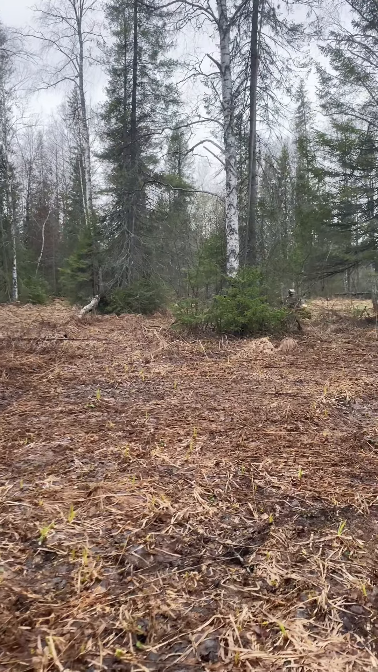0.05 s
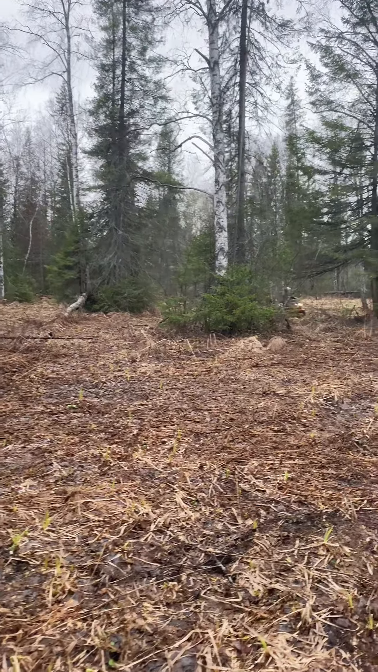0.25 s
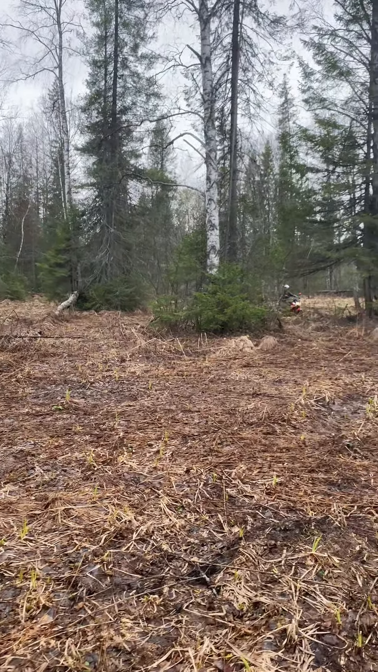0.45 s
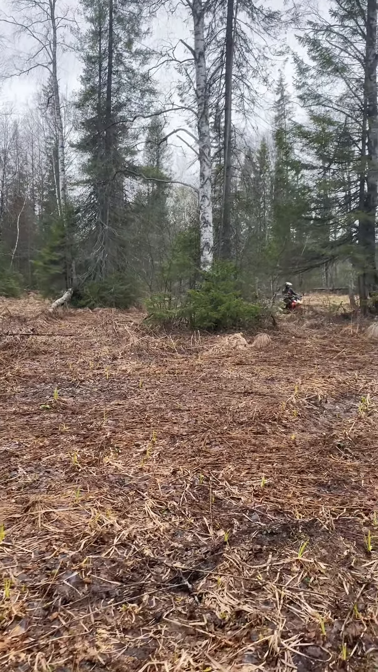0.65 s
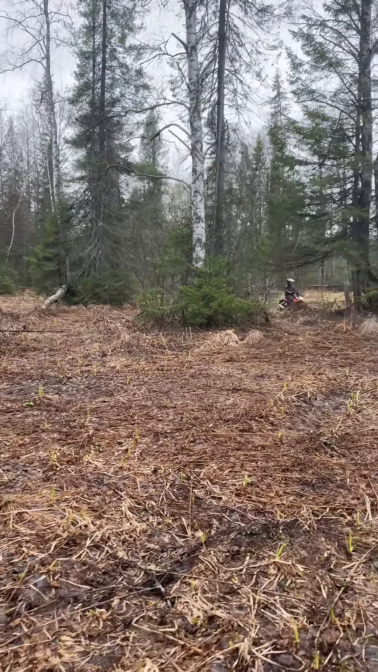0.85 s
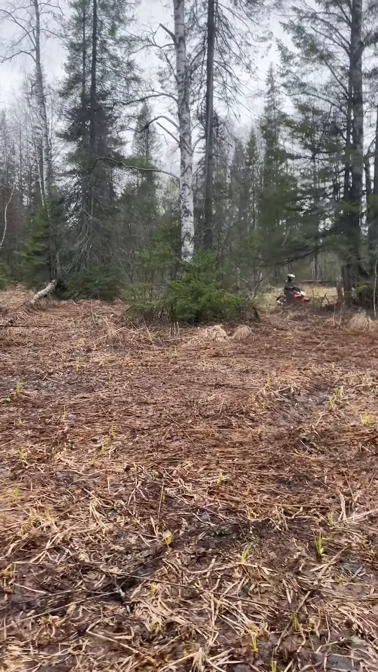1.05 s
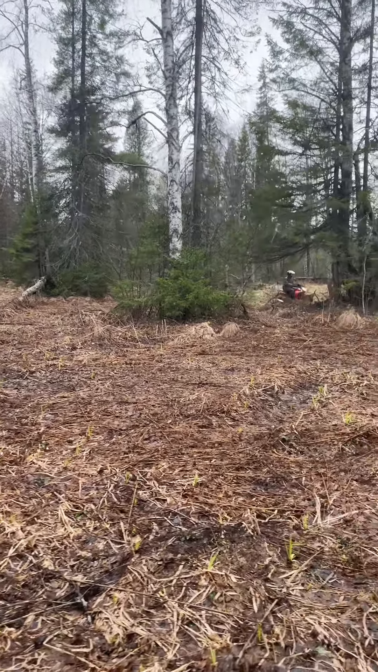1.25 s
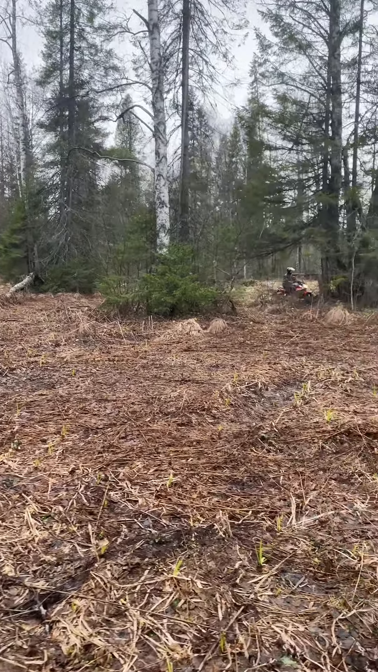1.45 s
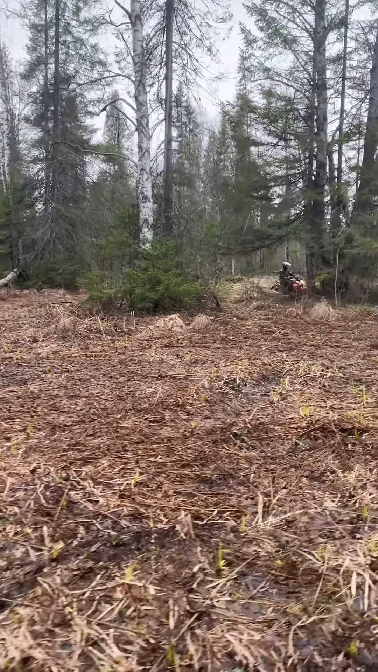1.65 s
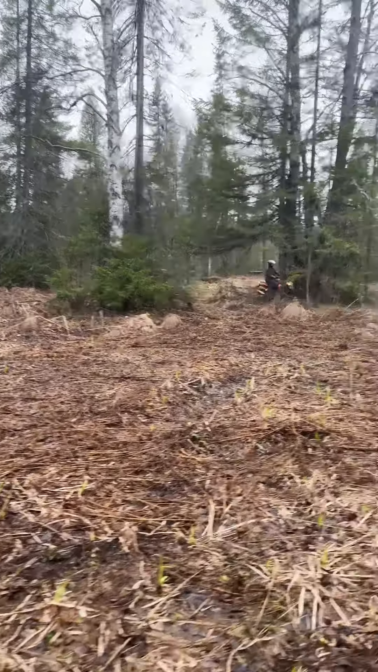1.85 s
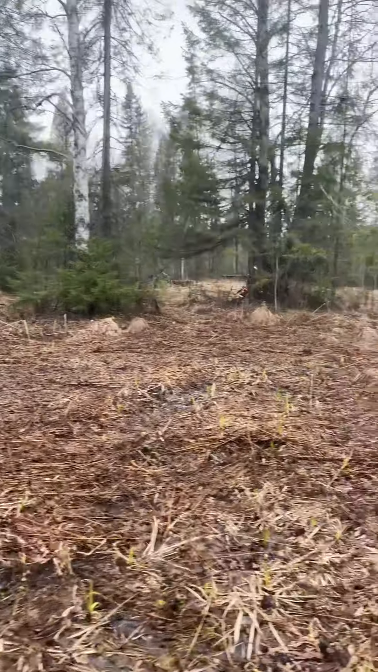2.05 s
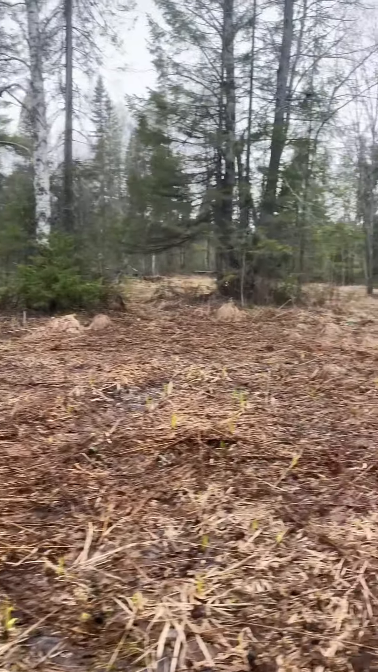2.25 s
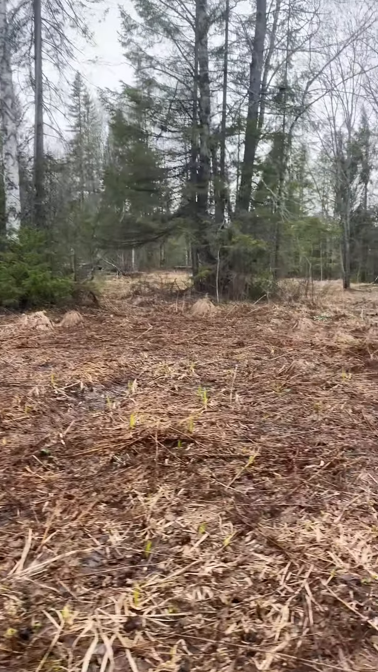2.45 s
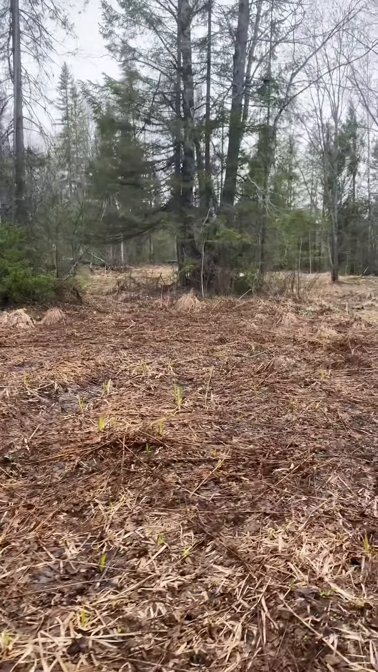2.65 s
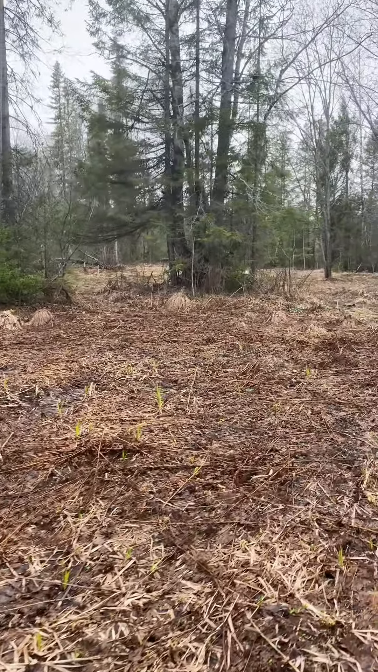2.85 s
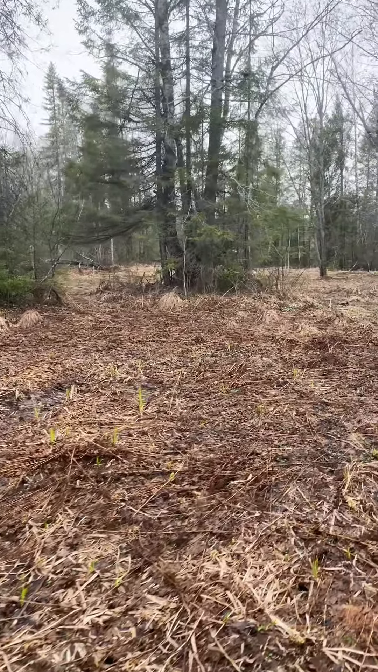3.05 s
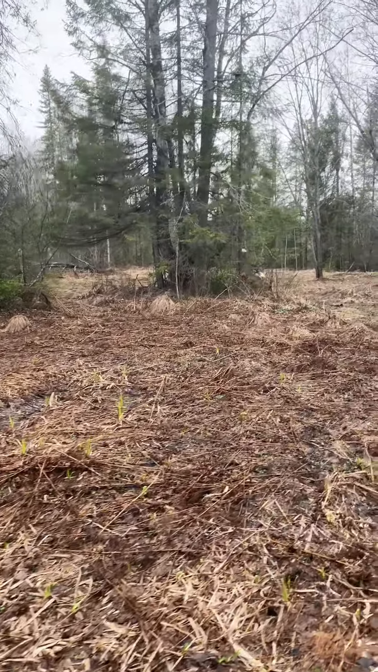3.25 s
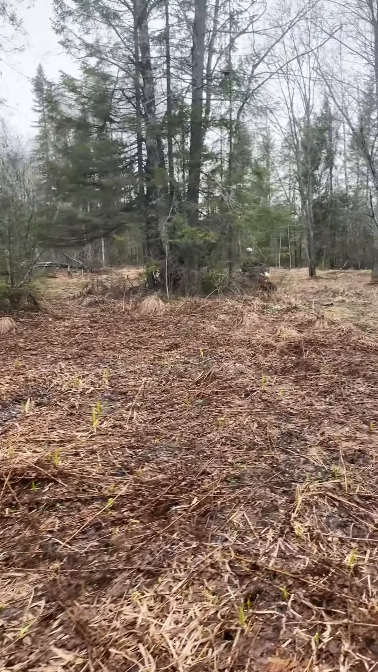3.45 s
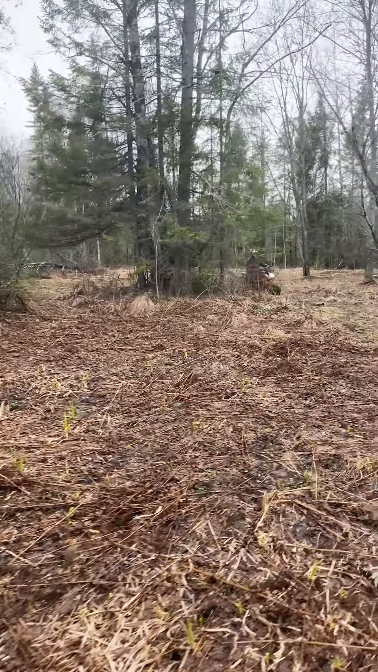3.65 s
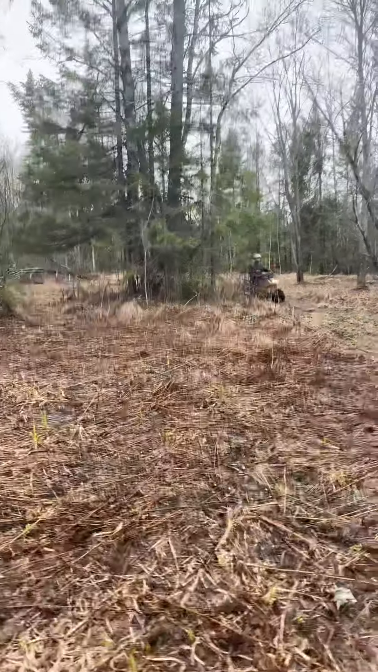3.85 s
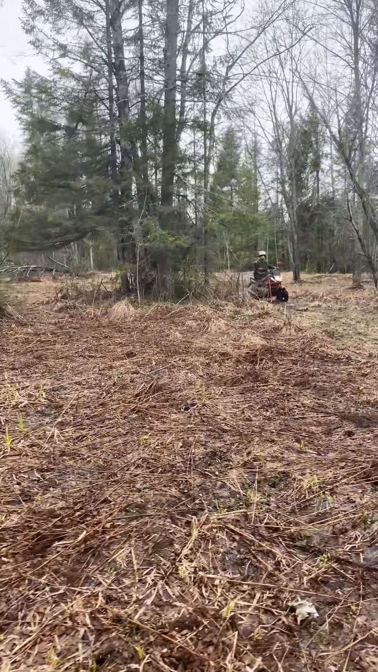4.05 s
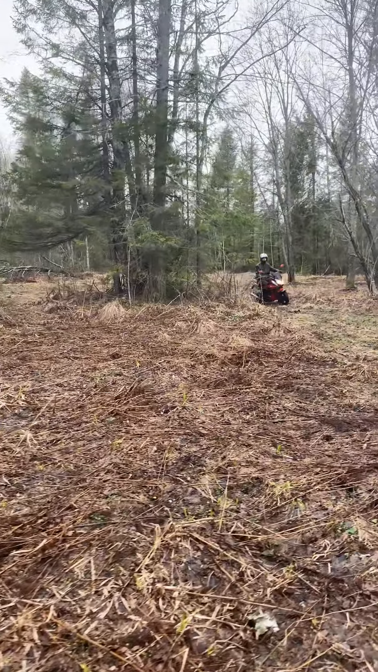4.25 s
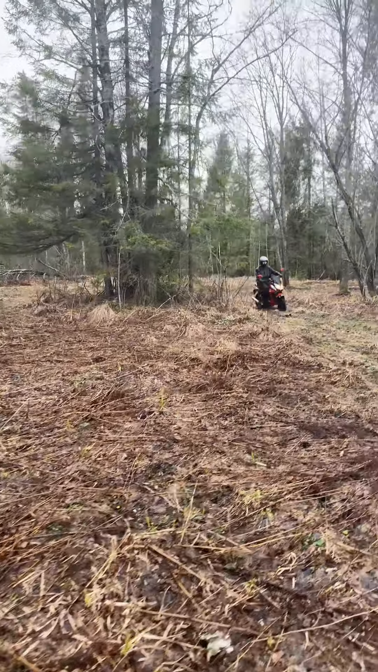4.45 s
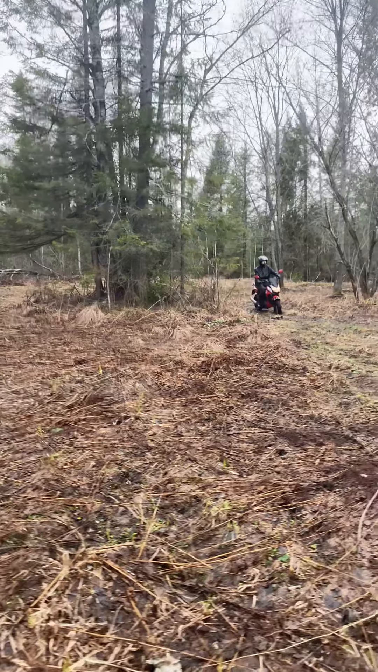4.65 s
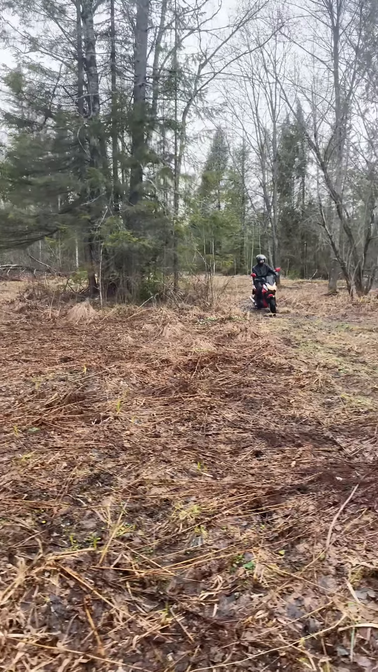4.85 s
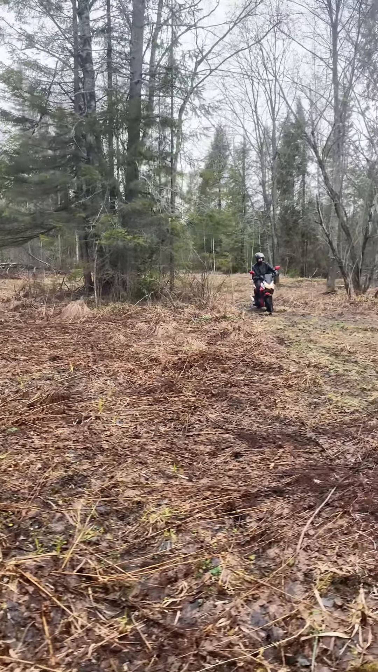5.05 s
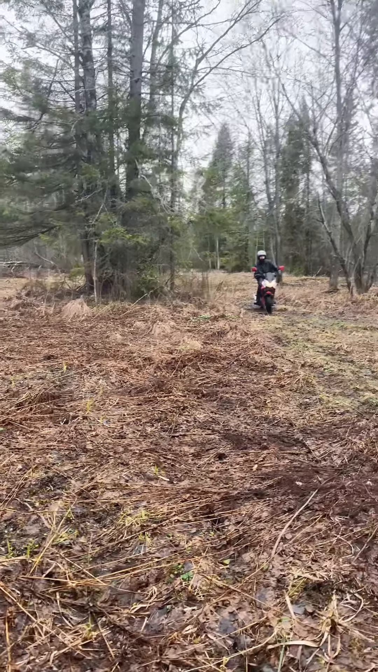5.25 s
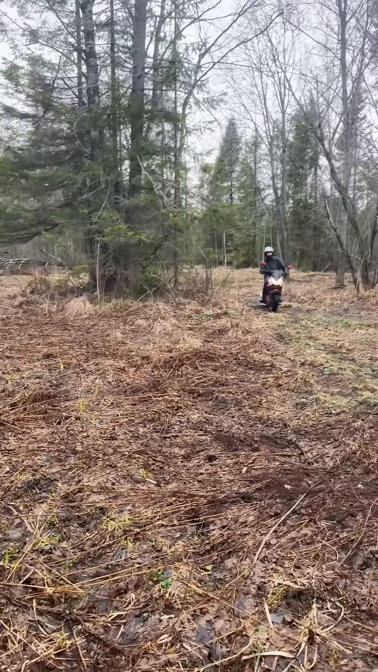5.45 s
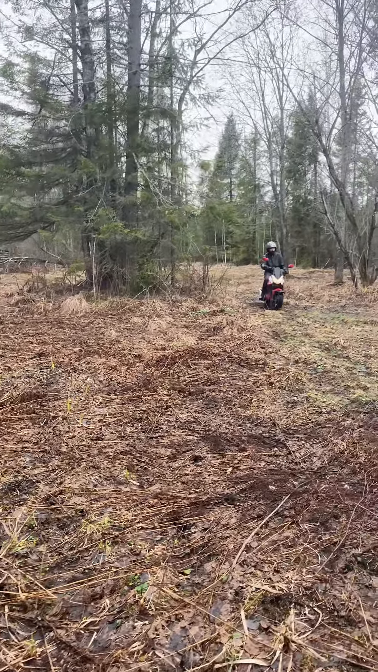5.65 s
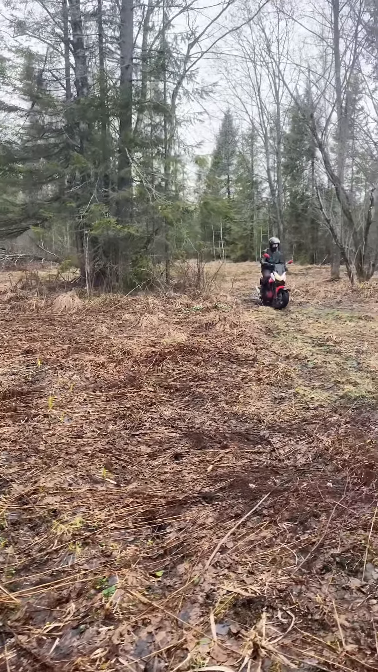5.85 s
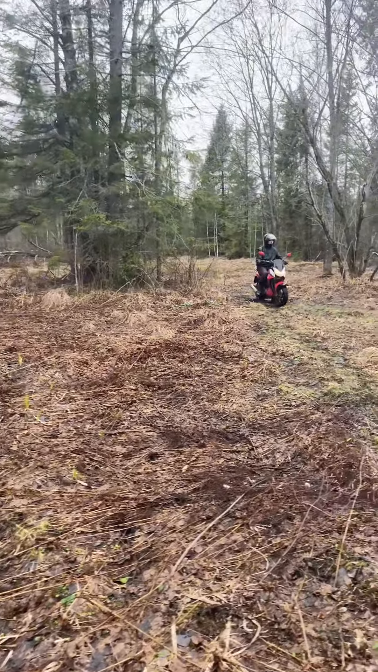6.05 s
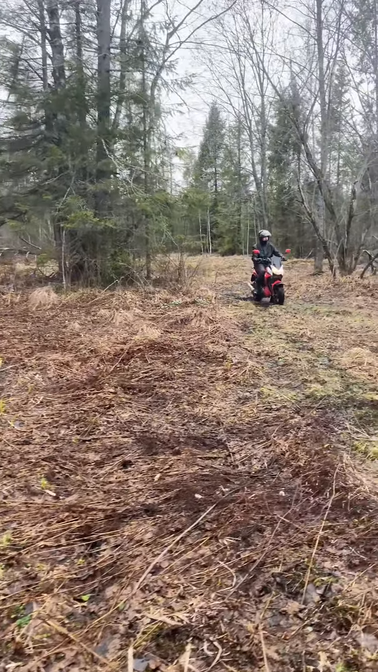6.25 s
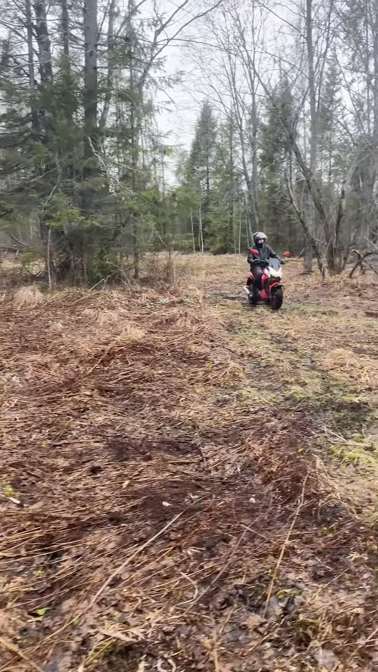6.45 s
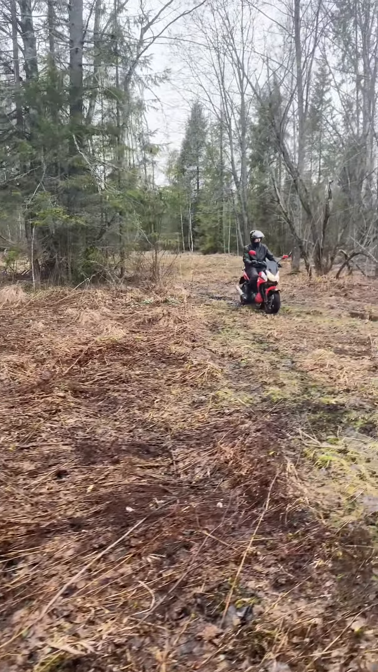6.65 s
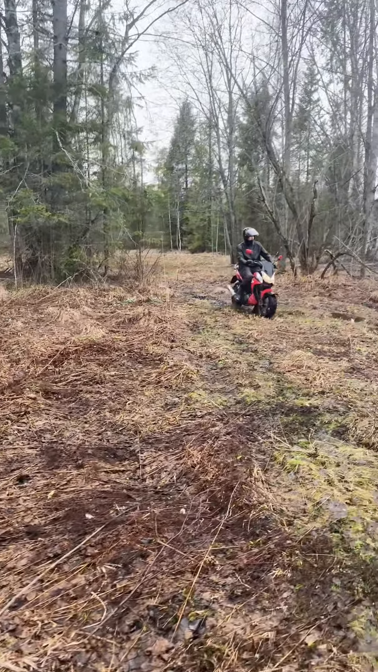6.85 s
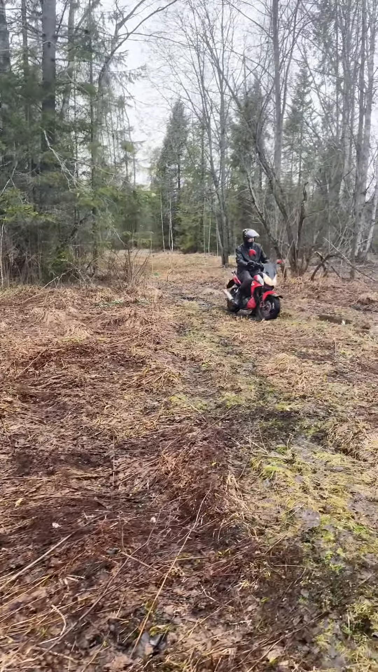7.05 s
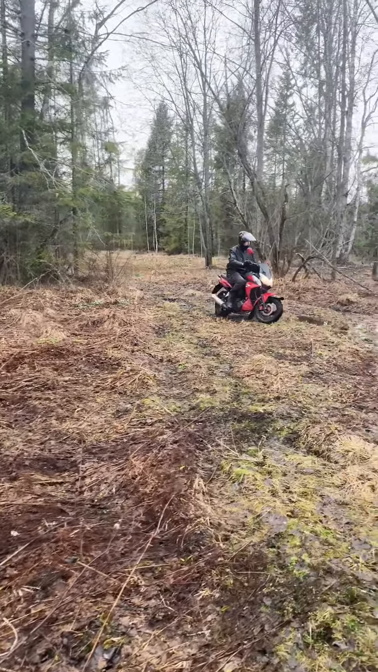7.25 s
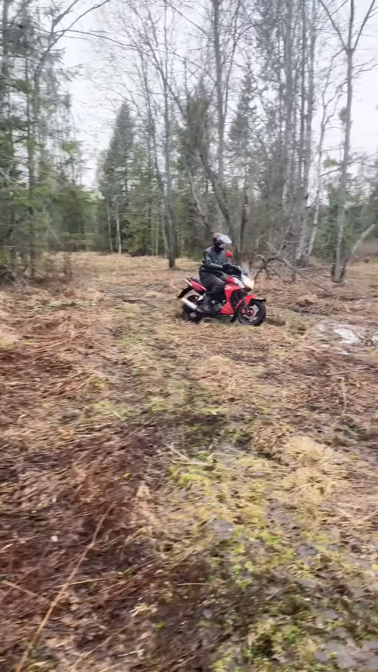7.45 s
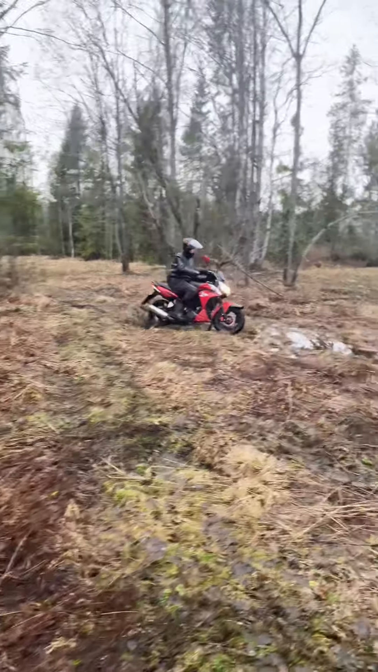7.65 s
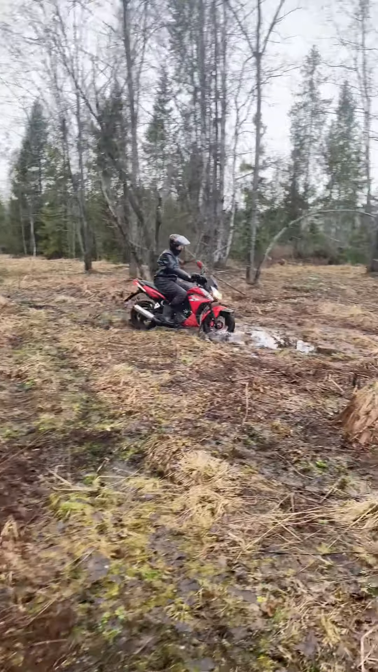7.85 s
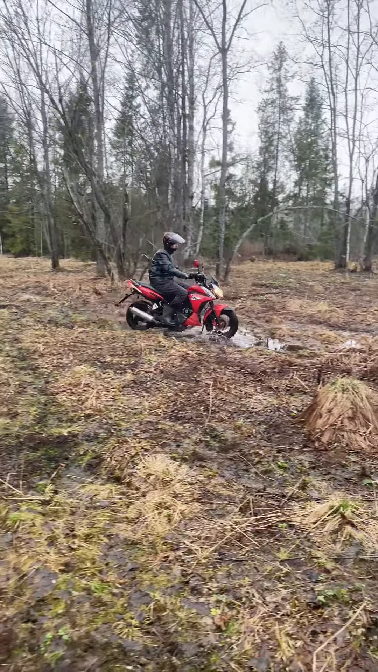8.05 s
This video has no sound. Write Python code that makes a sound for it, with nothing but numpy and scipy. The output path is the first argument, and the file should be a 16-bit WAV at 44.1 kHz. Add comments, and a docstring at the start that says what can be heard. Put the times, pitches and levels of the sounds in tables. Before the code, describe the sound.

A small single-cylinder motorcycle throbs through a quiet forest, fades behind trees, then putters close and revs up past the microphone over crackling dry grass.

```python
"""A small single-cylinder four-stroke motorcycle picks its way over dry grass at a forest edge and comes close.
Every firing knocks on the metal cylinder, then booms in the exhaust; the throttle is opened in short pulls.
Clicks timed by the engine ring resonances; intake rasp and clatter are noise shaped by the same timing.
Dry stalks rustle and snap near the microphone (shaped noise), gusts and dull bumps buffet it,
a bird whistles two notes, and the forest is a steady, softly flickering noise with a faint echo."""
import sys
import numpy as np
from scipy import signal
from scipy.fft import rfft, irfft, next_fast_len
from scipy.io import wavfile
from scipy.ndimage import uniform_filter1d

SR = 44100
rng = np.random.default_rng(int(sys.argv[2]) if len(sys.argv) > 2 else 0)


def digitize_waveform(pressure):
    """Quantize a signal to 16-bit integers and store it at the path in sys.argv[1].

    Rows of a 2-D input are taken as channels; values are limited to [-1, 1].
    """
    field = np.atleast_2d(pressure).T
    bounded = np.clip(field, -1, 1)
    quanta = np.round(bounded * 32767).astype(np.int16)
    wavfile.write(sys.argv[1], SR, quanta)


N = 357651
TIME = np.arange(N) / SR  # seconds

# The engine's speed. Each row: time in seconds, firings per second.
ENGINE_SPEED = [(0.0, 25.67), (0.08, 26.96), (0.24, 23.86), (0.32, 24.54), (0.72, 22.09), (0.8, 23.07),
                (0.96, 26.58), (1.2, 27.26), (1.44, 31.32), (1.6, 27.19), (1.84, 25.75), (1.92, 28.28),
                (2.16, 25.93), (2.4, 29.89), (2.48, 28.69), (2.64, 30.08), (2.72, 29.16), (2.88, 31.05),
                (3.04, 30.03), (3.12, 26.68), (3.52, 28.14), (3.68, 29.36), (4.0, 26.99), (4.48, 23.94),
                (4.56, 17.93), (4.64, 20.5), (4.72, 19.49), (4.88, 20.55), (5.04, 17.88), (5.2, 17.54),
                (5.28, 19.0), (5.44, 17.09), (5.76, 17.17), (5.84, 20.06), (5.92, 20.1), (6.08, 25.84),
                (6.16, 26.68), (6.24, 29.57), (6.48, 23.85), (6.64, 18.86), (6.72, 19.74), (6.8, 17.42),
                (6.88, 18.0), (7.12, 23.89), (7.2, 29.63), (7.36, 32.38), (7.52, 36.71), (7.6, 36.45),
                (7.68, 31.98), (7.76, 30.33), (7.92, 31.65), (8.11, 30.96)]


def from_db(db):
    """Turn decibels into a gain."""
    return np.exp(np.asarray(db) * np.log(10) / 20)


def rms_one(x):
    """Scale a sound to an average strength (rms) of 1."""
    return x / np.sqrt(np.mean(x ** 2) + 1e-20)


def in_time(rows):
    """Read every column of a table as a curve with one value per sample."""
    seconds, *columns = np.transpose(rows)
    return [np.interp(TIME, seconds, column) for column in columns]


def at_hz(points, hz):
    """Read a curve over pitch, with straight lines on a log-frequency axis."""
    table_hz, values = np.array(points).T
    return np.interp(np.log(hz), np.log(table_hz), values)


def held(start_s, end_s, ramp_s):
    """Rise to 1, hold and fall; the ramps are centred on start and end."""
    return np.clip(np.minimum(TIME - start_s, end_s - TIME) / ramp_s + .5, 0, 1)


def bell(middle_s, half_s):
    """A smooth swell of height 1."""
    return np.exp(-((TIME - middle_s) / half_s) ** 2)


def delayed(x, lag_s):
    """The same sound a little later."""
    return np.interp(TIME - lag_s, TIME, x, left=0)


def drift(rate):
    """Smooth random wandering of spread 1 that changes about rate times a second."""
    return rms_one(np.interp(TIME * rate, np.arange(8192), rng.standard_normal(8192)))


def cut(x, hz, kind, order=2):
    """Butterworth filter: keep the lows, the highs or a band."""
    sections = signal.butter(order, hz, kind, fs=SR, output="sos")
    return signal.sosfilt(sections, x + 1e-18)  # the tiny offset avoids slow arithmetic near zero


def resonate(x, modes):
    """Ring several resonances side by side, with alternating signs."""
    out = 0
    for k, (hz, width_hz, db) in enumerate(modes):
        r = np.exp(-np.pi * width_hz / SR)  # what is left of the ringing one sample later
        gain = (-1) ** k * from_db(db) * (1 - r * r) / 2
        feedback = [1, -2 * r * np.cos(2 * np.pi * hz / SR), r * r]
        out = out + signal.lfilter([gain, 0, -gain], feedback, x + 1e-18)
    return out


def bending(x, modes, ratio):
    """Ring resonances side by side while their pitches follow a ratio that changes in time."""
    out = 0
    for k, (hz, width_hz, db) in enumerate(modes):
        r = np.exp(-np.pi * width_hz / SR)
        # shift the mode's pitch down to zero, smooth, and shift back up
        turn = np.exp(2j * np.pi * hz * np.cumsum(ratio) / SR)
        smooth = signal.lfilter([1 - r], [1, -r], (x + 1e-18) / turn)
        out = out + (-1) ** k * from_db(db) * 2 * (turn * smooth).real
    return out


def evened(x):
    """Bring the strength to 1 over a few engine cycles; the single throbs stay."""
    power = uniform_filter1d(uniform_filter1d(x ** 2, size=SR // 9), size=SR // 12)
    return x / np.sqrt(np.abs(power) + 1e-14)


def coloured(spectrum, patchy_db):
    """Stereo noise in half-octave bands, each flickering by itself; rms 1."""
    # How alike the two channels are. Each row: frequency in Hz, correlation.
    likeness = [(60, 1), (250, 0.29), (600, 0.078), (2000, 1), (4500, 1), (10000, 1)]
    out = 0
    edges = 22 * 2 ** np.arange(0, 9.6, .5)  # Hz
    white = rng.standard_normal((2, 2, N))
    for k, (low, high) in enumerate(zip(edges, edges[1:])):
        if high < spectrum[0][0] or low > spectrum[-1][0]:
            continue
        mid, side = cut(white[k % 2], [low, high], "band")
        hz = np.sqrt(low * high)
        alike = np.clip(at_hz(likeness, hz), -1, 1)
        gain = from_db(at_hz(spectrum, hz) + patchy_db * drift(30))
        stereo = np.sqrt(1 + alike) * mid + np.sqrt(1 - alike) * side * [[1], [-1]]
        out = out + gain * stereo
    return rms_one(out)


def strokes(cycle, spread, lag_s=0):
    """One click lag_s after the cycle count passes a whole number; strengths vary by spread dB."""
    at = np.flatnonzero(np.diff(np.floor(cycle)) > 0) + int(lag_s * SR)
    clicks = np.zeros(N + SR)
    clicks[at] = from_db(spread * rng.standard_normal(512)[:len(at)])
    return clicks[:N]


def dying(clicks, decay_s):
    """An envelope that jumps at each click and dies away."""
    return signal.lfilter([1], [1, -np.exp(-1 / (decay_s * SR))], clicks + 1e-18)


def loudness(law):
    """Level in dB of one voice of the engine, from distance, speed and throttle."""
    # The ride swings out behind the trees, then comes close. Each row: time in seconds, distance in m.
    distance = [(0, 17.9), (2.1, 29), (2.95, 25.7), (3.5, 21.3), (4.4, 13.5), (5.7, 9.8), (6.7, 8.6),
                (7.4, 8.1), (8.11, 7.46)]
    # Pulls on the throttle. Each row: start and end in seconds, opening at the start (0 to 1).
    pulls = [(0.443, 1.23, 0.67), (1.25, 1.914, 0.55), (4.594, 5.783, 0.41), (5.796, 6.301, 0.92),
             (6.412, 6.583, 0.3), (6.868, 7.14, 0.42), (7.132, 7.598, 0.7), (7.666, 8.214, 0.76)]
    # the law's base level holds at this distance and speed with the throttle shut
    reference_m, cruise_rate = 13.54, 29.47  # metres, firings per s
    full_rate = 33.2  # firings per s; extra speed above this changes no level
    twist_s, ease_per_s = 0.14, 0.1  # the wrist's turning time; share it eases off per second of a pull
    base_db, near_db, speed_db, throttle_db = law
    metres, = in_time(distance)
    firing_rate, = in_time(ENGINE_SPEED)
    throttle = 0
    for start_s, end_s, opening in pulls:
        eased = 1 - ease_per_s * (TIME - start_s)
        throttle = throttle + opening * eased * held(start_s, end_s, twist_s)
    halvings = np.log2(reference_m / metres)
    revving = np.minimum(firing_rate, full_rate) - cruise_rate
    return base_db + near_db * halvings + speed_db * revving + throttle_db * throttle


def forest_air(level_db=-55.0):
    """The forest's background: wide, patchy noise."""
    # Colour of the noise. Each row: frequency in Hz, relative dB per Hz.
    air_colour = [(22, -23), (45, 5), (110, -4), (220, 10), (450, 8), (750, 3), (1700, -4), (3000, -5.5),
                  (6000, -19), (10000, -12.5), (15000, -14.5)]
    return from_db(level_db) * coloured(air_colour, patchy_db=3.0)


def trees(x, t60=0.19, wet_db=-19, dull_hz=3500):
    """The trunks scatter a faint, dull, late echo that falls by 60 dB in t60 seconds."""
    t = TIME[:SR]
    scatter = cut(rng.standard_normal((2, SR)), dull_hz, "low")
    scatter *= from_db(-60 * t / t60) * (1 - np.exp(-t / 0.033))  # builds up, then dies away
    scatter *= np.sqrt(2 * dull_hz / SR / np.sum(scatter[0] ** 2))
    return from_db(wet_db) * signal.fftconvolve(x, scatter, axes=1)[:, :N]


def wind(breeze_db=-62, breeze_swing_db=-7):
    """Gusts tumble over the microphone ports, above a light breeze."""
    # Each row: middle in seconds, half length in seconds, level in dB.
    gust_swells = [(0.78, 0.089, -34), (0.942, 0.086, -17.5), (1.144, 0.085, -29.5), (3.847, 0.23, -40),
                   (4.253, 0.044, -40.5), (4.436, 0.12, -34.5), (4.582, 0.37, -40.5), (6.63, 0.14, -32.5)]
    # Colour of the noise. Each row: frequency in Hz, relative dB per Hz.
    wind_colour = [(22, -26), (42, 3.5), (62, 10), (100, 3), (200, -10), (400, -55.5), (900, -63),
                   (3000, -67)]
    gusts = sum(from_db(db) * bell(s, half_s) for s, half_s, db in gust_swells)
    breeze = from_db(breeze_db + breeze_swing_db * drift(6.1))
    return (gusts + breeze) * coloured(wind_colour, patchy_db=2.5)


def bump(push_s=0.0011):
    """In the strongest gust, soft pushes on the microphone are answered by its housing with dull thuds."""
    # Each row: time in seconds, peak level in dB.
    pushes = [(0.836, -24), (0.882, -22.5), (.962, -12.5), (1.008, -20.5)]
    housing = [(132, 160, -3.5), (246, 130, -1), (520, 300, -4.5)]  # Hz, width in Hz, relative dB
    out = 0
    for s, db in pushes:
        thud = resonate(bell(s, push_s), housing)
        out = out + from_db(db) * thud / np.abs(thud).max()
    return out


def bird(quaver_hz=25):
    """A far whistle arches up and down and ends on a short, nearly level note."""
    # Each row: start and end in seconds, Hz at the ends, Hz added in the middle, level in dB.
    notes = [(.357, 0.447, 4950, 420.4, -59), (0.456, .482, 5330, 30, -64)]
    out = 0
    for start_s, end_s, low_hz, arch_hz, db in notes:
        place = (2 * TIME - start_s - end_s) / (end_s - start_s)  # -1 at the start, 1 at the end
        arch = np.clip(1 - place ** 2, 0, 1)
        hz = low_hz + arch_hz * arch + quaver_hz * drift(133)
        gain = from_db(db + 3 * drift(91.5)) * held(start_s, end_s, .012)
        out = out + gain * np.sin(2 * np.pi * np.cumsum(hz) / SR)
    return out


def rustles(grain_db=3.0, stir_db=-64.5, stir_swing_db=3.5):
    """Dry grass is crushed in short, crackling swells and stirs faintly in between."""
    # Each row: middle in seconds, length in seconds, level in dB.
    crushes = [(1.77, 0.1, -58), (2.063, 0.036, -53.5), (2.272, 0.069, -43.5), (3.01, 0.049, -48.5),
               (3.132, 0.058, -52.5), (3.773, 0.064, -47.5), (4.513, 0.1, -53.5), (4.674, 0.058, -50.5),
               (4.84, 0.064, -56), (5.008, 0.062, -47.5), (5.176, 0.018, -52), (5.777, 0.042, -41.5)]
    # Colour of the noise. Each row: frequency in Hz, relative dB per Hz.
    grass_colour = [(400, -5.5), (1500, -6), (2800, -1), (4000, -8), (6000, -4.5), (10000, -9),
                    (15000, -15)]
    swell = 0
    for s, length_s, db in crushes:
        swell = swell + from_db(db) * np.exp(-np.abs(2 * (TIME - s) / length_s) ** 3 / 2)
    stir = from_db(stir_db + stir_swing_db * drift(11))
    crackle = rms_one(from_db(grain_db * drift(700)))
    return (swell + stir) * crackle * coloured(grass_colour, patchy_db=3.0)


def snaps(split_s=0.00064, splinter_s=0.0062, splinter_share=0.12, damping=0.3, upper_db=-6.0):
    """Each stalk or twig splits in a millisecond or two, splinters a little longer and rings at two pitches."""
    # Each row: start in seconds, peak level in dB, lower and upper ring in Hz.
    breaks = [(0.063, -35.5, 6360, 12000), (2.27, -32, 8400, 11000), (2.315, -20.5, 1590, 2770),
              (2.459, -38, 6300, 9000), (2.571, -36, 1430, 2000), (2.583, -22, 1370, 2560),
              (2.6, -19.5, 1330, 3300), (3.136, -30.5, 3580, 8000), (3.325, -34.5, 3800, 6000),
              (3.726, -33, 4270, 9400), (4.068, -31.5, 3000, 6500), (4.4148, -25.5, 7750, 14000),
              (4.523, -25.5, 3400, 7700), (6.004, -30, 7300, 12000), (6.194, -25, 6991, 12000),
              (6.702, -30, 6957, 13000)]
    out, t = np.zeros((2, N)), TIME[:SR // 30]
    tear = np.exp(-t / split_s) + splinter_share * np.exp(-t / splinter_s)
    for s, db, low_hz, high_hz in breaks:
        noise = rng.standard_normal(len(t)) + .5 * rng.standard_normal((2, len(t)))
        rings = [(low_hz, damping * low_hz, 0), (high_hz, damping * high_hz, upper_db)]
        crack = resonate(noise * tear, rings)
        start = int(s * SR)
        out[:, start:start + len(t)] += from_db(db) * crack / np.abs(crack).max()
    return out


def whine(level_db=-61.5, start_hz=940, sag_hz_per_s=20, octave_db=-5):
    """A narrow, unsteady tone from the gears with a faint octave, sinking slowly while the motorcycle turns."""
    # In order: start, end and fade in seconds.
    turning = (2.85, 4.35, .3)
    hz = start_hz - sag_hz_per_s * (TIME - turning[0])
    gain = held(*turning) * from_db(level_db + 2.5 * drift(40))
    phase = 2 * np.pi * np.cumsum(hz + 30 * drift(110)) / SR
    return gain * (np.sin(phase) + from_db(octave_db) * np.sin(2 * phase))


# Every engine law below holds, in order: level in dB with the throttle shut, dB per halving of distance,
# dB per extra firing per second, dB added by full throttle.


def clatter(cycle, tick_depth=1.0, grain_db=2.0, ring_db=-5):
    """Chain and tyres hiss in grains and ring the metal parts; the valves tick twice in every cycle."""
    clatter_law = (-53, 10.5, 0.45, 1)
    # Ringing metal parts. Each row: pitch in Hz, width in Hz, relative dB.
    metal_modes = [(1310, 200, 2), (1990, 16, -22), (2210, 770, 6), (4140, 160, 9), (4460, 570, 0),
                   (5980, 520, 5)]
    # Colour of the hiss. Each row: frequency in Hz, relative dB per Hz.
    hiss_colour = [(300, 1.5), (700, 5), (1000, 0.5), (1400, 1.5), (2200, 6.5), (3300, -28), (4700, -1),
                   (6700, -22.5), (10000, 1.5), (15000, -41)]
    valves = strokes(cycle - .16, 3) + strokes(cycle - .8, 3)
    ticking = 1 + tick_depth * dying(valves, decay_s=0.033)
    pulse = rms_one(ticking * from_db(grain_db * drift(500)))
    noise = rng.standard_normal(N) + 0.2 * rng.standard_normal((2, N))
    metal = rms_one(resonate(pulse * noise, metal_modes))
    hiss = pulse * coloured(hiss_colour, patchy_db=1.0)
    # the pairs are left and right level in dB
    mixed = hiss * from_db([[-1.2], [.2]]) + from_db(ring_db) * metal * from_db([[-3], [2]])
    return from_db(loudness(clatter_law)) * mixed


def rasp(cycle, gulp_s=0.0064, grain_db=4.0, steady_share=0.19):
    """Air tears through the intake in a rough burst with every firing and keeps rushing in between."""
    rasp_law = (-62.5, 10, 1.05, 11.5)
    # Resonances of the intake. Each row: pitch in Hz, width in Hz, relative dB.
    intake_modes = [(944, 220, 2.5), (1314, 290, 1.5), (1660, 410, 1), (2580, 730, -4)]
    bursts = steady_share + dying(strokes(cycle, 1.8, lag_s=0.0027), decay_s=gulp_s)
    air = bursts * from_db(grain_db * drift(900)) * rng.standard_normal(N)
    rough = rms_one(cut(resonate(air, intake_modes), 2500, "low", order=4))
    return from_db(loudness(rasp_law)) * rough * from_db([[-3], [2.4]])


def knock(cycle, own_share=0.5):
    """Combustion slaps the piston against the cylinder: a click and a short rattle in the cases."""
    knock_law = (-28.5, 5, 0, 22)
    # Firings that knock harder or softer than their neighbours. Each row: time in seconds, extra dB.
    accents = [(.624, 4.5), (.712, 6.5), (.758, 4.5), (.802, 3), (.963, 4.5), (1.222, 6), (1.36, -2),
               (1.392, -10), (1.783, 9), (1.822, 3.5), (4.579, 11.5), (4.63, -9), (4.729, 4.5), (4.78, 5),
               (4.928, 4.5), (5.093, -15), (5.205, -16), (5.313, 2), (5.425, -5), (5.482, 1.5), (5.827, 3),
               (5.878, -4), (5.927, 3.5), (6.019, 4.5), (6.098, 2.5), (6.136, 3), (6.173, 1), (6.209, 0.5),
               (6.279, -1), (6.428, 10), (6.51, 8.5), (6.925, 5), (7.151, 4), (7.189, 7), (7.223, 9),
               (7.256, 9), (7.287, 5), (7.319, 3), (7.381, 9.5), (7.411, 4), (7.47, 7.5), (7.552, 10.5),
               (7.697, 6), (7.986, 8.5), (8.018, 5)]
    # The pitch of the knock wanders from pull to pull. Each row: time in seconds, pitch ratio.
    ring_pitch = [(.6, 1.08), (1.3, 1.017), (4.7, 1.095), (5.9, 1.144), (6.4, 1.26), (7.25, 1.09),
                  (7.5, 1.12), (7.7, 0.99), (8.11, 1.11)]
    # Resonances of cylinder and cases. Each row: pitch in Hz before that ratio, width in Hz, relative dB.
    case_modes = [(853, 110, 7), (1420, 640, 4.5), (1838, 352, 12), (2290, 334, 3), (3900, 730, -9.5)]
    accent_db = sum(db * bell(s, .015) for s, db in accents)
    slaps = strokes(cycle, 1.1) * from_db(accent_db)
    grit = rng.standard_normal(N) + own_share * rng.standard_normal((2, N))
    force = slaps + .085 * dying(slaps, decay_s=.003) * grit
    # the small cases radiate the low part of the click poorly
    force = cut(force, 1700, "high")
    pitch, = in_time(ring_pitch)
    return from_db(loudness(knock_law)) * bending(force, case_modes, pitch) * from_db([[-3.2], [2.4]])


def exhaust(cycle, muffle_hz=212, gulp_hz=340):
    """Each firing sends a puff of gas through the exhaust valve; it rings silencer and pipe in four registers."""
    boom_law, chuff_law = (-39.5, 7.5, 2.5, 0), (-37.5, 5.5, -0.2, 4.5)
    thump_law, bark_law = (-30, 7.5, 0.6, 3.5), (-48.5, 16, 0.74, 7.5)
    # Resonances of silencer and pipe. Each row: pitch in Hz (before any pitch ratio), width in Hz, relative dB.
    boom_modes, chuff_modes = [(57, 12, 0)], [(105, 48, 0)]
    thump_modes, bark_modes = [(152.5, 25.5, 5)], [(270, 143, 0), (367.8, 94, -1), (473, 57, -8)]
    # The voice shifts with heat and gas flow. Each row: time in seconds, pipe pitch ratio,
    # silencer pitch ratio, second push share, intake gulp share, extra chuff in dB.
    voice = [(0, 0.98, 1.014, 0.15, .1, 0), (1.4, 1.17, 1.02, 0.21, .1, -6), (2.0, 0.93, 1.0, 0.12, .1, -5),
             (2.9, 1.21, 1.024, 0.74, .1, 1), (4.4, 0.95, 1.002, 0.078, 0.15, -0.5),
             (5.75, 0.82, 1.014, 0.29, 0.26, -1.5), (6.0, 0.77, 0.99, 0.23, .6, -1.5),
             (6.22, 0.83, 1.05, 0.52, .8, -1), (6.41, 1.025, 1, 0.041, 0.046, 5),
             (6.9, .9, 0.948, 0.055, 0.071, -2), (7.28, 1.005, 1.07, 0.061, 0.43, 0.5),
             (7.5, 0.97, 1.084, 0.11, 0.12, 1.5), (7.62, 0.94, 1.16, 0.98, .05, 1.5),
             (7.77, 1.11, 1.054, 1, 0.038, -1), (8.11, 0.95, 1.096, 0.35, 0.054, -2.5)]
    # The low exhaust note sinks briefly. Each row: middle in seconds, half length in seconds,
    # depth in dB for the thump (boom and chuff sink less).
    sinks = [(1.358, 0.18, 15.5), (2.366, 0.12, 13.5), (3.507, 0.12, 3), (4.483, 0.15, 5), (6.49, 0.21, 2),
             (7.52, 0.24, 2.5)]
    bark_scatter_db = -66.5  # scattered among the trunks, the bark never fades below this level
    misfire_s = 6.82
    turbulence = .013  # strength of the noise in the wake of each puff
    bounce_s, bounce_share = 0.01069, 0.08  # each puff bounces once inside the silencer, back weaker
    push_lag, gulp_lag = .178, .57  # shares of a cycle

    pipe_pitch, silencer_pitch, push_share, gulp_share, round_db = in_time(voice)
    dip_db = sum(depth_db * bell(s, half_s) for s, half_s, depth_db in sinks)
    boom_db = loudness(boom_law) - 0.84 * dip_db
    chuff_db = loudness(chuff_law) + round_db - 0.58 * dip_db
    thump_db = loudness(thump_law) - dip_db
    bark_db = 10 * np.log10(10 ** (loudness(bark_law) / 10) + 10 ** (bark_scatter_db / 10))

    # with the throttle nearly shut, one charge barely burns
    burn = np.where(np.abs(TIME - misfire_s) < .025, .2, 1)
    puffs = burn * strokes(cycle - .04, .4, lag_s=.003)
    fronts = burn * strokes(cycle, .5, lag_s=-.001)
    boom = cut(resonate(puffs, boom_modes), 100, "low", order=4)
    boom = cut(boom, 56.0, "high", order=4)
    # a short, round chuff leads at low speed; the swelling ring of two silencer chambers leads under load
    chuff = cut(resonate(puffs, chuff_modes), 153.4, "low", order=3)
    chuff = cut(chuff, 54.0, "high", order=3)
    first_chamber = bending(delayed(fronts, 0.0014), thump_modes, silencer_pitch)
    second_chamber = bending(first_chamber, thump_modes, silencer_pitch)
    thump = cut(second_chamber, muffle_hz, "low", order=4)

    # the sharp front, the rising piston's push on the rest of the gas, and the wake reach higher pipe modes
    pushes = push_share * strokes(cycle - push_lag, .5, lag_s=-.001)
    wake = turbulence * dying(fronts, decay_s=.012) * rng.standard_normal(N)
    gas = fronts + pushes + wake
    # then the intake gulps
    gulps = gulp_share * cut(strokes(cycle - gulp_lag, 0.89), gulp_hz, "low")
    pipe = bending(gas + bounce_share * delayed(gas, bounce_s) + gulps, bark_modes, pipe_pitch)
    bark = cut(cut(pipe, 551, "low", order=4), 172.5, "high", order=4)

    lows = from_db(boom_db) * evened(boom) + from_db(chuff_db) * evened(chuff)
    highs = from_db(thump_db) * evened(thump) + from_db(bark_db) * evened(bark)
    return lows * from_db([[-.4], [.4]]) + highs * from_db([[-2.2], [1.9]])


def scene():
    """The crank drives exhaust, knock, rasp and clatter; the forest lies around them."""
    # A clump of spruces hides the motorcycle and shades knock, rasp and clatter.
    # In order: start, end and ramp in seconds, shading in dB.
    hidden = (2.59, 2.83, 0.42, 24)
    first_cycle = .734  # share of an engine cycle already run at the start
    firing_rate, = in_time(ENGINE_SPEED)
    cycle = first_cycle + np.cumsum(firing_rate) / SR
    start_s, end_s, ramp_s, shade_db = hidden
    shade = from_db(-shade_db * held(start_s, end_s, ramp_s))
    shaded = shade * (knock(cycle) + rasp(cycle) + clatter(cycle))
    bike = exhaust(cycle) + shaded + whine()
    nearby = rustles() + snaps() + wind() + bump() + bird()
    return bike + trees(bike) + forest_air() + nearby


def record(dry, shade_hz=570, shade_q=0.82, cutoff_hz=15800):
    """The left port lacks low middle, the two hear out of phase, both dip in the treble; the top is cut."""
    # Phase by which the left port leads. Each row: frequency in Hz, phase in radians.
    port_phase = [(30, 0), (500, 0.5), (1100, 1.13), (1720, -1.9), (2500, 1.43), (3620, 0.96), (5170, 1.26),
                  (6100, 1.02), (7500, 2.5), (9730, 1.04), (12500, 1.02)]
    # Dips in the microphone's response. Each row: frequency in Hz, width in Hz.
    treble_dips = [(7100, 1120), (7750, 650), (13600, 5260)]
    left = dry[0] - 0.73 * signal.lfilter(*signal.iirpeak(shade_hz, shade_q, fs=SR), dry[0])
    size = next_fast_len(N + SR // 10)
    bin_hz = np.maximum(np.arange(size // 2 + 1) * SR / size, 1)
    turned = rfft(dry[1], size) * np.exp(-1j * at_hz(port_phase, bin_hz))
    right = irfft(turned, size)[:N]
    heard = np.array([left, right])
    for hz, width_hz in treble_dips:
        heard = signal.lfilter(*signal.iirnotch(hz, hz / width_hz, fs=SR), heard)
    return signal.sosfilt(signal.ellip(10, .1, 80, cutoff_hz, fs=SR, output="sos"), heard)


dry = scene()
out = record(dry)
digitize_waveform(out)
```